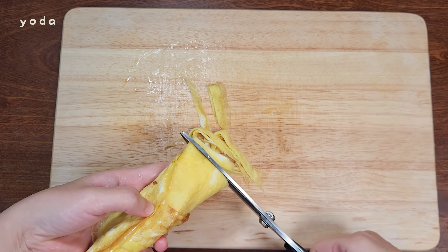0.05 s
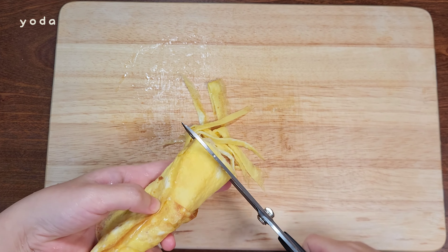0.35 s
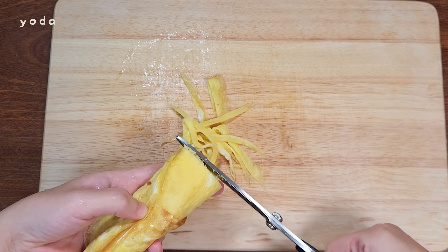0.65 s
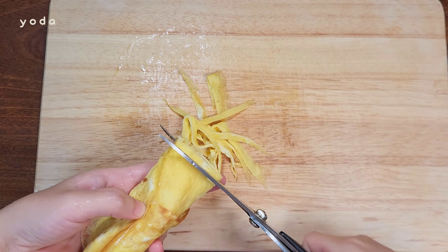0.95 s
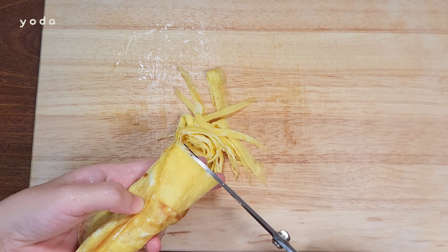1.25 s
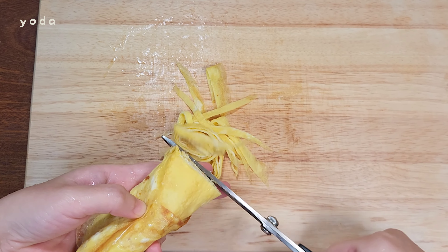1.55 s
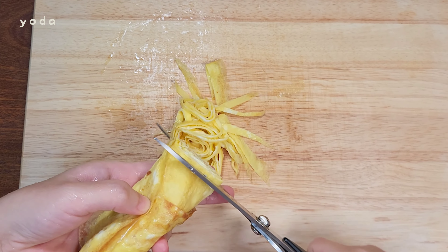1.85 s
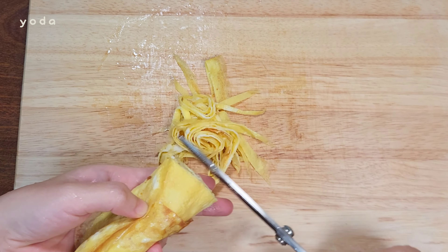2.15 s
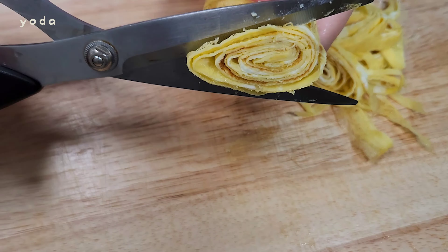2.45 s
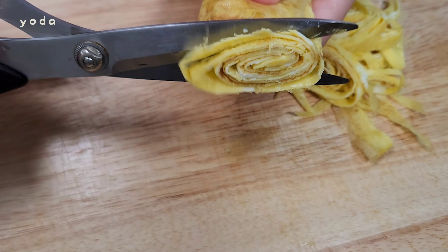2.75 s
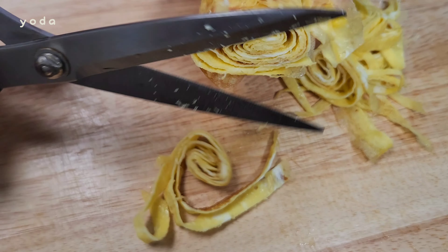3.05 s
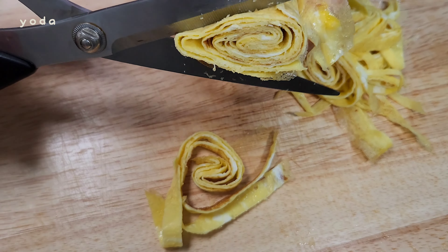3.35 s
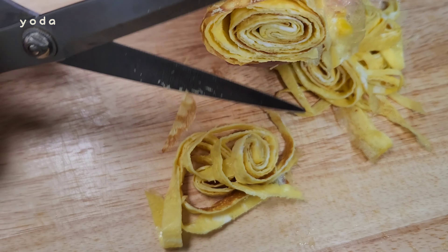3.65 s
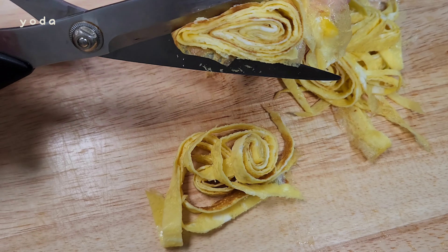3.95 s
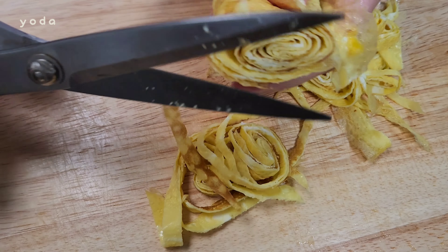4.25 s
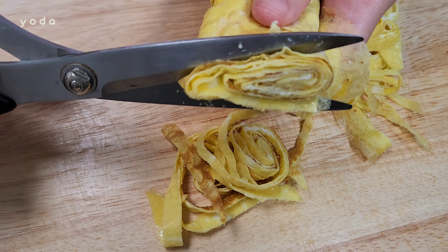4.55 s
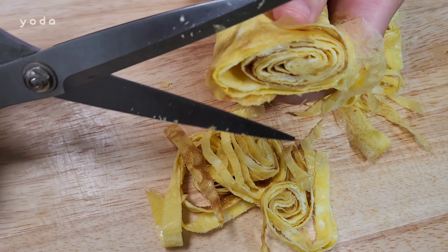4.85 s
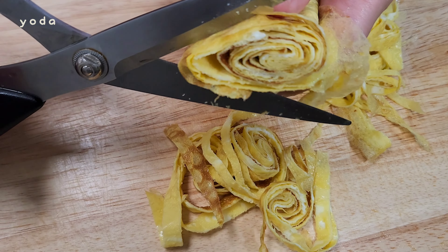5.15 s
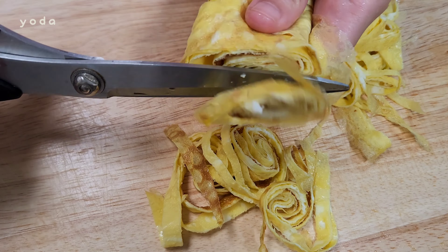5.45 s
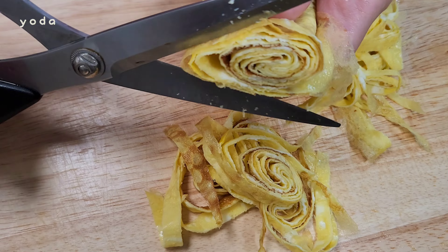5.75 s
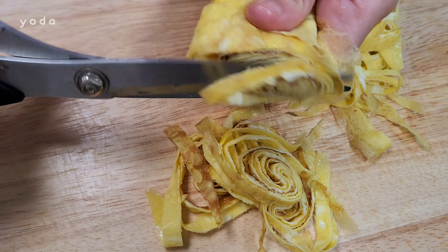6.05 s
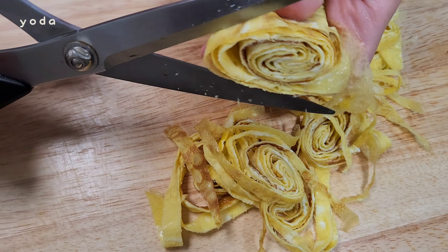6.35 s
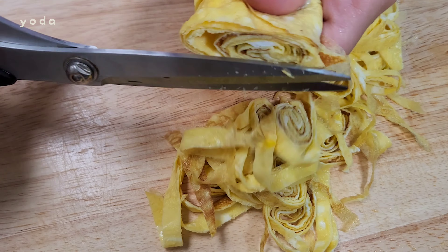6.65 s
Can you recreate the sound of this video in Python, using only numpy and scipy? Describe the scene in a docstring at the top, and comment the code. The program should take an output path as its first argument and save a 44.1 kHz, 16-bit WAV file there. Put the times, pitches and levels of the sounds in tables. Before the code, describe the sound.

Kitchen scissors cut a thin rolled omelette over a wooden board, close to the microphone. The blades rub lightly, then make five snips, each with a sliding hiss, a tiny crunch and a metallic rattle. The blades scrape and their tips bump the board, then six more cuts follow, most with a harder clack of the handles. A low appliance rumble runs underneath in the small kitchen.

```python
"""Kitchen scissors cut a thin rolled omelette over a board, close by, above a low appliance rumble.
First the blades slide and rub lightly. From 0.8 s come five cuts: friction hiss grows, the edges crunch
through, the joint rattles, the handles clack, and the egg bumps softly on the board. Near 3 s the blades
scrape and their tips bump the wood. Six more cuts follow from 3.7 s, most with a harder clack.
Between some of these later strokes the whole sound drops out for a moment."""
import sys
import numpy as np
from scipy import signal
from scipy.fft import rfft, irfft
from scipy.io import wavfile
from scipy.ndimage import uniform_filter1d

SR = 44100
rng = np.random.default_rng(int(sys.argv[2]) if len(sys.argv) > 2 else 0)


def master(y):
    """Save y as 16-bit WAV."""
    cut = np.clip(np.atleast_2d(y).T, -1, 1)
    pcm = np.round(cut * 32767)  # scale
    wavfile.write(sys.argv[1], SR, pcm.astype(np.int16))


N = 299880
TIME = np.arange(N) / SR

# blades snap shut: t/s, clack level/dB, clack f/Hz, rattle level/dB, rattle decay/s,
# low resonance gain/dB, treble gain/dB, egg squash level/dB, left-right balance/dB
SNAPS = [(0.7792, -46.5, 3400, -35.5, 0.0022, 5, -10, -69, 4),
         (1.2925, -59, 3400, -38, 0.0056, 3.5, -4.5, -67, 0.5),
         (1.743, -35, 2860, -30.5, 0.0061, -0.5, -6, -59, 0.5),
         (2.25, -36.5, 2790, -34.5, 0.0061, 3, -6, -64, 2),
         (2.5138, -38, 3430, -25.5, .004, 1, -6.5, -70, 2.5),
         (3.6917, -26, 3200, -28.5, 0.0033, -1, 2, -48.5, 0.5),
         (4.3134, -24, 3120, -24, 0.0033, -11, -1.5, -54, 0),
         (4.862, -26.5, 3630, -28, 0.0075, -2.5, -0.5, -50, -1),
         (5.6341, -39, 3550, -37, 0.0066, -0.5, 0, -49, -2),
         (6.243, -56.5, 3400, -44, 0.0059, 1, 1.5, -47.5, 2.5),
         (6.7834, -27.5, 3200, -30.5, 0.0048, -3, -2.5, -67, 0.5)]
# blades slide together: closing t/s, duration/s, final hiss level/dB, fade/s
CLOSINGS = [(0.25, 0.11, -64, .07), (0.64, 0.092, -64.5, .06), (1.30, 0.17, -66, .09),
            (1.745, 0.12, -63, .08), (2.25, 0.22, -64, .1), (2.52, 0.12, -62.5, .12),
            (3.05, 0.37, -59, .08), (3.24, 0.13, -56.5, .045), (3.69, 0.27, -60, .09),
            (4.31, 0.29, -61, .09), (4.87, 0.24, -61, .19), (5.62, 0.21, -57, .09), (6.23, 0.22, -57, .11),
            (6.78, .25, -55, .1)]
# blades rub as they part or catch: t/s, level/dB, decay/s, treble tilt/dB
SCRAPES = [(0.04, -70, .04, 11), (0.224, -53, 0.011, 0), (0.263, -52, 0.0099, 4), (0.313, -48.5, 0.013, -2),
           (0.63, -51.5, 0.008, 9), (0.767, -55, 0.012, 4), (0.870, -44.5, .01, 5),
           (1.245, -58.5, 0.022, 5), (1.365, -47.5, 0.012, 1), (1.799, -48.5, .016, 0),
           (2.615, -48.5, .006, 9), (3.007, -46.5, .007, 9), (3.031, -48, 0.02, 2),
           (3.078, -40, 0.028, -0.5), (3.203, -51.5, 0.018, 12), (3.254, -55, 0.025, 4),
           (3.753, -52, 0.025, 10), (4.399, -56, 0.034, 6), (4.926, -52, 0.02, 0),
           (5.718, -55, 0.017, 16.5), (6.716, -58, 0.0062, 11)]
# handles reach the end of their play: t/s, level/dB
HANDLE_TICKS = [(0.113, -67), (1.415, -52.5), (3.818, -48)]
# a blade is flicked: t/s, level/dB, decay/s
FLICKS = [(0.05, -72, .03), (3.200, -61, .045), (4.397, -54, .008), (4.927, -57, .018), (5.634, -55, .008),
          (6.240, -54, .008)]
# blade tips meet the board: t/s, level/dB
TIP_BUMPS = [(3.090, -55), (3.154, -49.5), (3.207, -54), (3.353, -59.5), (3.488, -65), (4.044, -64),
             (5.045, -54), (6.345, -67), (6.715, -53)]
# broad modes of blades and joint: f/Hz, bandwidth/Hz, gain/dB
SCISSOR_MODES = [(775, 430, 4.5), (1330, 1300, 3.5), (2840, 490, 6), (3600, 450, 4.5), (4470, 300, 1.5),
                 (5415, 420, 7.5), (6340, 350, 6), (7350, 560, 6), (9760, 2400, 4.5), (14290, 830, 7.5)]
# narrow modes of the steel: f/Hz, bandwidth/Hz, gain/dB
STEEL_MODES = [(2060, 120, 1.5), (2990, 110, 1.5), (3670, 100, 1.5), (4170, 90, 3), (5340, 78, 2.5),
               (6400, 90, 2), (7750, 140, 3), (9550, 120, 3), (11030, 150, 2)]
# modes of the handles: f/Hz, bandwidth/Hz, gain/dB
HANDLE_MODES = [(1178, 230, 18.5), (1730, 160, 9.5), (3150, 360, 14.5), (3780, 400, 13.5), (5360, 230, 2),
                (7950, 220, 18), (10130, 360, -2), (13830, 1400, 6.5)]
# modes of the board: f/Hz, bandwidth/Hz, gain/dB
BOARD_MODES = [(550, 120, 8.5), (980, 88, 10.5), (1235, 110, 11.5), (1650, 210, 3.5), (2500, 510, 2.5)]
# partials of one free blade: f/Hz, relative level/dB
BLADE_PARTIALS = [(5400, 2), (7300, -8)]
# spectrum of sliding steel: f/Hz, relative level/dB
SLIDE_SPECTRUM = [(700, -9.5), (1500, -9.5), (2500, -5.5), (4300, -9), (5300, -4.5), (6400, -7),
                  (7600, 1.5), (8500, -2), (9600, -1.5), (11000, -7), (13000, -4.5), (15500, -7.5)]
# rumble before RUMBLE_SHIFT_S: f/Hz, spectral level/dB
EARLY_RUMBLE = [(20, -81), (45, -85.5), (70, -75.5), (110, -80), (152, -74.5), (215, -88), (340, -84),
                (480, -93), (750, -102), (1150, -105), (1700, -117), (3500, -124), (7500, -124),
                (15000, -131)]
# rumble from then on: f/Hz, spectral level/dB
LATE_RUMBLE = [(20, -79), (45, -83.5), (70, -70.5), (100, -75.5), (150, -70), (230, -80), (330, -88.5),
               (460, -95.5), (780, -105), (1130, -100), (1700, -117), (3500, -123), (7500, -123),
               (15000, -130)]
# the rumble swells on low notes: start t/s, end t/s, f/Hz, level/dB
RUMBLE_NOTES = [(0.0, 2.6, 154, -62), (2.6, 3.45, 43, -55), (2.6, 6.8, 150, -57.5), (4.5, 5.8, 70, -55.5)]
# peaks that make the background hollow: f/Hz, bandwidth/Hz, gain/dB
HOLLOW_PEAKS = [(2344, 1900, 4.5), (4760, 730, 7), (7600, 590, 5), (9360, 1000, 11)]
# steady faint hiss: f/Hz, spectral level/dB
NOISE_FLOOR = [(20, -123), (4000, -122), (7000, -128), (16000, -134)]
# brief dips of the whole sound: start t/s, end t/s, gain/dB
DROPOUTS = [(2.5556, 2.579, -21), (3.0366, 3.0756, -41), (3.428, 3.443, -27), (4.657, 4.675, -26),
            (6.526, 6.543, -24.5)]

RATTLE_RISE_S, TYPICAL_RATTLE_S = .0013, .005   # the rise at a typical decay; slower snaps set in softly
CRUNCH_DB, CRUNCH_FOLLOWS = -54.5, .4   # the crunch follows this share of the rattle's change in dB
SQUASH_LEAD_S, RELEASE_LAG_S, RELEASE_DB = 0.027, 0.074, -12   # the egg is pressed, then drops back
RUMBLE_SHIFT_S = 2.565


def snips(crunch_rise_s=0.016, crunch_decay_s=0.007, crunch_treble_db=10, crackle_db=-6):
    """Forced vibration: edges crunching through egg, then the loose joint's rattle, drive the steel."""
    rattle = friction(0.17, grain_db=0.5, grain_hz=1520)
    low_rattle = resonance(rattle, hz=660, width_hz=380)
    crackling = from_db(crackle_db) * crackle(per_s=370, spread_db=6.5)
    crunch = rms_one(stereo_noise(0.43) + crackling)
    usual_db = np.mean([rattle_db for _, _, _, rattle_db, *_ in SNAPS])
    force, treble = np.zeros((2, 2, N))
    for at, _, _, rattle_db, decay, low_db, treble_db, _, pan_db in SNAPS:
        rise = RATTLE_RISE_S * (decay / TYPICAL_RATTLE_S) ** 2
        chatter = rattle + (from_db(low_db) - 1) * low_rattle
        joint = from_db(rattle_db) * swell(at, rise, decay) * chatter
        crunch_db = CRUNCH_DB + CRUNCH_FOLLOWS * (rattle_db - usual_db)
        edges = from_db(crunch_db) * swell(at, crunch_rise_s, crunch_decay_s) * crunch
        force += (joint + edges) * panned(pan_db)
        treble += (joint + edges * from_db(crunch_treble_db)) * from_db(treble_db)
    return steel(force, treble)


def clacks(right_lag_s=0.00024, pan_db=8, bounce_s=0.0015, bounce_db=-8, contact_db=4,
           heft=0.65, heft_hz=2000):
    """Impact excitation: the handles meet and rebound once; harder blows carry more low frequencies."""
    knock, thump = np.zeros((2, 2, N))
    hardest_db = max(clack_db for _, clack_db, *_ in SNAPS)
    impulse_gain = np.sqrt(SR / 1000)   # a millisecond's energy in one sample
    for (at, clack_db, hz, *_, side_db), jitter in zip(SNAPS, rng.uniform(0.9, 1.05, len(SNAPS))):
        blow = np.zeros(N)
        blow[round(at * SR)] = 1
        blow[round((at + bounce_s * jitter) * SR)] = from_db(bounce_db)
        blow = blow + (from_db(contact_db) - 1) * resonance(blow, hz, width_hz=500)
        blow = blow * from_db(clack_db) * impulse_gain * panned(side_db + pan_db)
        knock += blow
        thump += blow * from_db(heft * (clack_db - hardest_db))
    force = butter(thump, heft_hz, "low", order=1) + butter(knock, heft_hz, "high", order=1)
    left, right = body(force, HANDLE_MODES, low_hz=850, high_hz=4200)
    # the handles are on the left, so their sound reaches the right side later
    late_right = np.interp(TIME - right_lag_s, TIME, right, left=0)
    return np.array([left, late_right])


def rubs(rise_s=0.0036, pan_db=1.5, crackle_db=-6):
    """Stick-slip friction: the blades catch and drive the steel in short, gritty scrapes."""
    level, treble = np.zeros((2, N))
    for at, db, decay, tilt_db in SCRAPES:
        press = from_db(db) * swell(at, rise_s, decay)
        level += press * from_db(-tilt_db / 2)
        treble += press * from_db(tilt_db / 2)
    grit = from_db(crackle_db) * crackle(per_s=700, spread_db=6)
    scrape = rms_one(friction(0.038, grain_db=1.5, grain_hz=710) + grit)
    return steel(level * scrape, treble * scrape) * panned(pan_db)


def slide(growth_db=12, onset_s=0.1, pan_db=3, crackle_db=-12):
    """Sliding friction: steel on steel hisses, growing as the blades close and fading as they part."""
    sliding = friction(0.152, grain_db=2.5, grain_hz=503)
    grit = from_db(crackle_db) * crackle(per_s=200, spread_db=5)
    power = np.zeros(N)
    for closed, closing_s, db, fade_s in CLOSINGS:
        t = TIME - closed
        moving = np.clip((t + closing_s) / onset_s + .5, 0, 1)   # the hand gets going
        growth = from_db(growth_db * np.clip(t / closing_s, -1, 0))
        fade = np.exp(-np.maximum(t, 0) / fade_s)
        power += (from_db(db) * moving * growth * fade) ** 2
    hiss = rms_one(coloured(sliding + grit, SLIDE_SPECTRUM))
    return hiss * np.sqrt(power) * panned(pan_db)


def ticks(rise_s=.0012, decay_s=0.0032, pan_db=7):
    """Backlash: the handles chatter briefly at the end of their play, exciting their modes."""
    touch = sum(from_db(db) * swell(at, rise_s, decay_s) for at, db in HANDLE_TICKS)
    return body(touch * stereo_noise(0.33), HANDLE_MODES, low_hz=1100, high_hz=4200) * panned(pan_db)


def pings(rise_s=0.00078, waver_db=3, waver_hz=70):
    """Damped free vibration: a flicked blade rings faintly, wavering as the other blade brushes it."""
    ping = rms_one(sum(from_db(db) * np.sin(2 * np.pi * hz * TIME) for hz, db in BLADE_PARTIALS))
    brushing = from_db(waver_db * fluctuation(waver_hz))
    envelope = sum(from_db(db) * swell(at, rise_s, decay) for at, db, decay in FLICKS)
    return ping * brushing * envelope


def bumps(rise_s=0.0038, decay_s=.016, pan_db=4.5):
    """Soft impact: the moist egg around each snap, and the blade tips, excite the board's modes."""
    squashes = [(at - SQUASH_LEAD_S, db) for at, *_, db, _ in SNAPS]
    releases = [(at + RELEASE_LAG_S, db + RELEASE_DB) for at, *_, db, _ in SNAPS]
    press = sum(from_db(db) * swell(at, rise_s, decay_s) for at, db in squashes + releases + TIP_BUMPS)
    force = press * friction(0.79, grain_db=2.5, grain_hz=350)
    wood = body(force, BOARD_MODES, low_hz=491.6, high_hz=2500)
    return butter(wood, 5000, "low") * panned(pan_db)


def kitchen(x, wet_db, t60=0.16, onset_s=0.0035, dull_hz=9000):
    """Reverberation: dense reflections from worktop and walls decay exponentially, unlike on each side."""
    t = TIME[:SR // 2]
    build_up = 1 - np.exp(-(t / onset_s) ** 2)
    tail = rng.standard_normal((2, len(t))) * from_db(-60 * t / t60) * build_up
    tail = butter(tail, dull_hz, "low", order=1)
    tail /= np.linalg.norm(tail, axis=1, keepdims=True)
    return x + from_db(wet_db) * signal.fftconvolve(x, tail, axes=1)[:, :N]


def rumble(diffuse_hz=540, right_lag_s=0.00017, note_width_hz=9.8, deep_hz=110,
           deep_pan_db=1.5, upper_pan_db=3):
    """Interaural coherence: an appliance's rumble is alike in both ears in the bass, diffuse above."""
    mid, side = rng.standard_normal((2, N))
    coherent = np.array([mid, np.roll(mid, round(right_lag_s * SR))])
    diffuse = butter(side, diffuse_hz, "high") * np.array([[.8], [-.8]])
    air = with_peaks(coherent + diffuse, HOLLOW_PEAKS)
    tone = np.where(TIME < RUMBLE_SHIFT_S, coloured(air, EARLY_RUMBLE), coloured(air, LATE_RUMBLE))
    for start, end, hz, db in RUMBLE_NOTES:
        band = resonance(rng.standard_normal(N), hz, note_width_hz)
        note = rms_one(resonance(band, hz, note_width_hz))
        gate = uniform_filter1d(1. * ((TIME > start) & (TIME < end)), size=4000)
        tone = tone + from_db(db) * note * gate
    deep = butter(tone, deep_hz, "low", order=1)
    return deep * panned(deep_pan_db) + (tone - deep) * panned(upper_pan_db)


def steel(force, treble_force, wander_db=3.5, wander_hz=18, gain_db=-1):
    """Modal coupling: the travelling contact picks out one narrow mode of the scissors after another."""
    x = butter(force, 5700, "low", order=1) + butter(treble_force, 7200, "high", order=1)
    for hz, width_hz, db in STEEL_MODES:
        contact = np.clip(fluctuation(wander_hz), -1.5, 1.5)
        x = x + resonance(x * (from_db(db + wander_db * contact) - 1), hz, width_hz)
    return from_db(gain_db) * body(x, SCISSOR_MODES, low_hz=540, high_hz=9100)


def body(force, modes, low_hz, high_hz):
    """Radiation: an object sounds in a broad band shaped by its modes; white noise keeps its level."""
    x = np.vstack([force, signal.unit_impulse(N)])   # the third row yields the impulse response
    band = butter(butter(x, low_hz, "high"), high_hz, "low", order=1)
    radiated = with_peaks(band, modes)
    return radiated[:2] / np.linalg.norm(radiated[2])


def with_peaks(x, modes):
    """Resonances in cascade: each scales its own band by its gain."""
    for hz, width_hz, db in modes:
        x = x + (from_db(db) - 1) * resonance(x, hz, width_hz)
    return x


def resonance(x, hz, width_hz):
    """Damped oscillator: a two-pole band-pass with unit peak gain."""
    r = np.exp(-np.pi * width_hz / SR)
    numerator = np.array([1, 0, -1]) * (1 - r * r) / 2
    denominator = [1, -2 * r * np.cos(2 * np.pi * hz / SR), r * r]
    return signal.lfilter(numerator, denominator, x + 1e-18)


def friction(likeness, grain_db, grain_hz):
    """Stick-slip modulation: noise whose strength jumps from one tiny slip to the next."""
    slips = np.clip(fluctuation(grain_hz), -2, 2)
    return rms_one(stereo_noise(likeness) * from_db(grain_db * slips))


def crackle(per_s, spread_db):
    """Poisson process: tiny ticks of uneven size, each panned at random; unit rms."""
    size = from_db(spread_db * np.minimum(rng.exponential(1, N), 3)) * rng.choice([-1, 1], N)
    occurs = rng.random(N) < per_s / SR
    return rms_one(size * occurs * panned(rng.normal(0, 5, N)))


def stereo_noise(likeness):
    """Partial coherence: two channels of white noise with correlation `likeness`."""
    mid, side = rng.standard_normal((2, N))
    return np.sqrt((1 + likeness) / 2) * mid + np.sqrt((1 - likeness) / 2) * np.array([side, -side])


def fluctuation(hz):
    """Random modulation: low-passed noise of unit rms."""
    return rms_one(butter(rng.standard_normal(N), hz, "low"))


def coloured(white, spectrum):
    """Spectral shaping: give unit white noise the stated level in each 1 Hz band."""
    hz, db = np.transpose(spectrum)
    bins = np.maximum(np.fft.rfftfreq(N, 1 / SR), 1)
    gain = from_db(np.interp(np.log(bins), np.log(hz), db)) * np.sqrt(SR / 2)
    return irfft(rfft(white) * gain, N)


def swell(at, rise, decay):
    """Transient envelope: exponential rise to 1, then exponential decay."""
    t = TIME - at
    time_constants = np.maximum(-t / max(rise, 1e-4), t / max(decay, 1e-4))
    return np.exp(-np.minimum(time_constants, 30))


def panned(left_right_db):
    """Interaural level difference as two channel gains."""
    return from_db(np.array([[.5], [-.5]]) * left_right_db)


def butter(x, hz, kind, order=2):
    """Causal Butterworth filter."""
    return signal.sosfilt(signal.butter(order, hz, kind, fs=SR, output="sos"), x + 1e-18)


def rms_one(x):
    """Normalisation to unit rms."""
    return x / np.sqrt(np.mean(x ** 2) + 1e-20)


def from_db(db):
    """Decibels to amplitude ratio."""
    return 10 ** (np.asarray(db) / 20)


def scene():
    """Superposition: scissors and board over the rumble; the near handles clack with less reverberation."""
    cutting = kitchen(snips() + rubs() + ticks() + pings() + bumps(), wet_db=-14.5)
    background = rumble() + coloured(stereo_noise(0), NOISE_FLOOR)
    return cutting + kitchen(clacks(), wet_db=-24.5) + slide() + background


def record(dry, cutoff_hz=16000):
    """Gating and band limiting: the level dips briefly five times, and the highest treble is cut."""
    dip_db = sum(db * ((TIME > start) & (TIME < end)) for start, end, db in DROPOUTS)
    dipped = dry * uniform_filter1d(from_db(dip_db), size=40)
    return signal.sosfilt(signal.ellip(10, .2, 70, cutoff_hz, fs=SR, output="sos"), dipped)


dry = scene()
out = record(dry)
master(out)
```